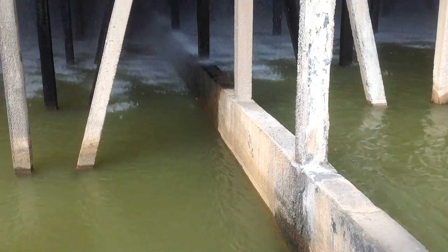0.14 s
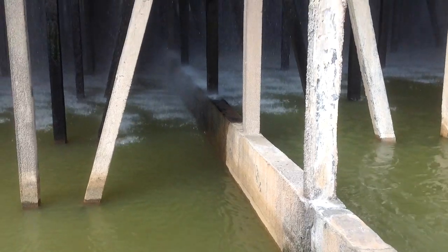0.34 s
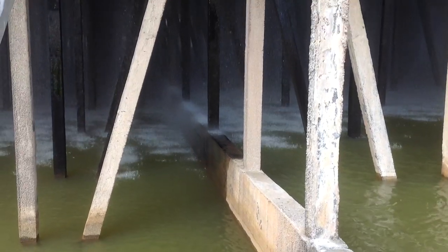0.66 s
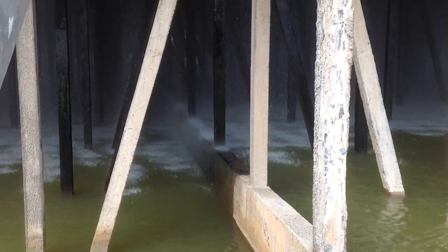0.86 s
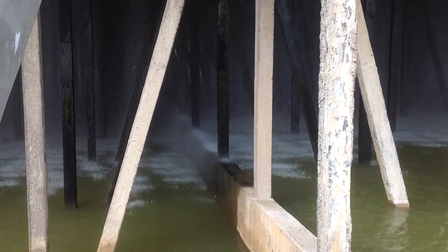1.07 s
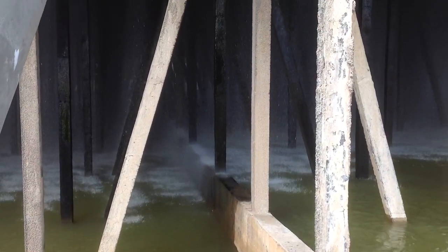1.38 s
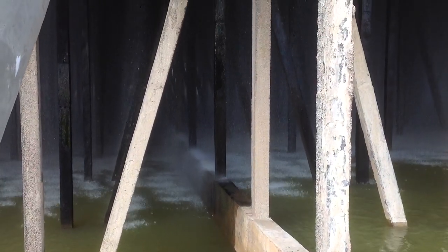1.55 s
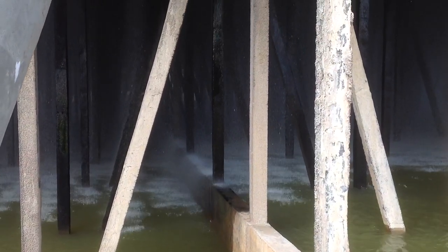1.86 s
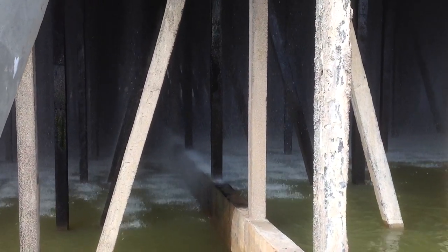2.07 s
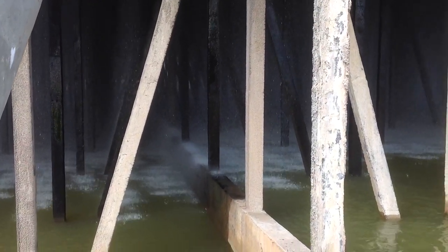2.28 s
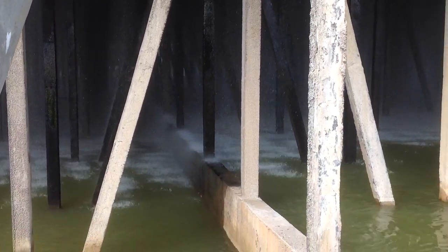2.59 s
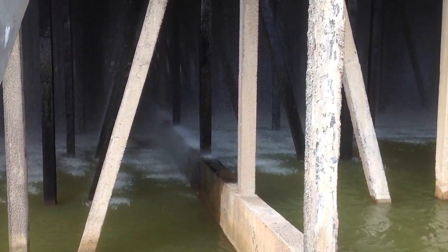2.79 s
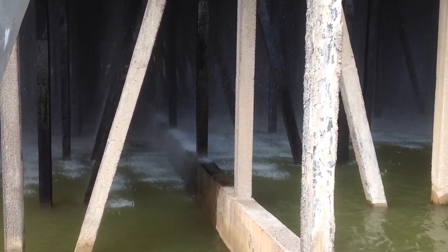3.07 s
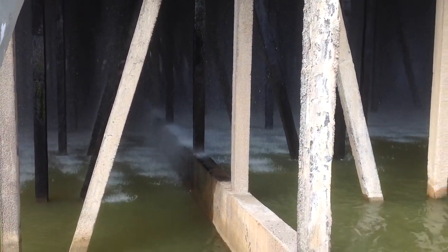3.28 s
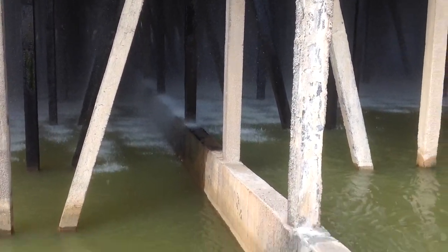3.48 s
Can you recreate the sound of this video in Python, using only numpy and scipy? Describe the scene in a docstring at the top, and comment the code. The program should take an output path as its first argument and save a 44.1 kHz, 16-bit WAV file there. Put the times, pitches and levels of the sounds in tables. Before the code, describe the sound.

After a blink of silence, a loud continuous downpour starts abruptly: bright hiss, fine drop ticks and a dark hollow roar inside a cooling tower, with wind rumble and two quick thumps on the mono microphone.

```python
"""After a moment of silence, a deep roar under a dense hiss: water rains down inside a big cooling
tower and lands in its basin, heard from the open side. Roar and hiss are shaped, drifting noise;
drops are random impulses and bubbles are short decaying tones. The draught rumbles and buffets
a single microphone as low noise, and twice thumps it with a sharp pressure swing."""
import sys
import numpy as np
from scipy import signal
from scipy.fft import rfft, irfft
from scipy.io import wavfile
from scipy.ndimage import uniform_filter1d

SR = 44100
rng = np.random.default_rng(int(sys.argv[2]) if len(sys.argv) > 2 else 0)


def inscribe(sig):
    """Save sig as 16-bit PCM at rate SR to the path in sys.argv[1].

    A 1-D sig is mono; a 2-D sig holds one channel per row.
    Samples are clipped to [-1, 1] before scaling.
    """
    pcm = np.round(np.clip(np.atleast_2d(sig).T, -1, 1) * 32767)
    wavfile.write(sys.argv[1], SR, pcm.astype(np.int16))


N = 160524
TIME_S = np.arange(N) / SR
FREQ_HZ = np.fft.rfftfreq(N, 1 / SR)


def amp(db):
    """Decibels to gain."""
    return 10 ** (np.asarray(db) / 20)


def unit(x):
    """Scales to an rms of one."""
    return x / np.sqrt(np.mean(x ** 2) + 1e-20)


def curve(points):
    """Joins (time [s], value) points by straight lines."""
    return np.interp(TIME_S, *np.transpose(points))


def colour(x, points):
    """Filters by a spectrum table, read on a log-frequency axis."""
    table_hz, table_db = np.transpose(points)
    gain_db = np.interp(np.log(FREQ_HZ + 1), np.log(table_hz + 1), table_db)
    return irfft(rfft(x) * amp(gain_db), N)


def smooth(x, size, axis=0):
    """Slow random drift: two moving averages, scaled to an rms of one."""
    once = uniform_filter1d(x, size, axis)
    return unit(uniform_filter1d(once, size, axis))


def wash(points, patch_db, swell_db):
    """Countless impacts merged into noise that swells as a whole and in drifting patches."""
    size, hop = 512, 128  # samples
    frames, bins = N // hop + 5, size // 2 + 1
    real, imag, patches = rng.standard_normal((3, frames, bins))
    patches = smooth(smooth(patches, size=14), size=6, axis=1)  # over time, then frequency
    swell = smooth(rng.standard_normal(frames), size=14)[:, None]
    gain = amp(patch_db * patches + swell_db * swell)
    frames_spectrum = (real + 1j * imag) * gain
    noise = signal.istft(frames_spectrum.T, nperseg=size, noverlap=size - hop)[1][:N]
    return unit(colour(noise, points))


def impacts(per_s, spread_db):
    """Randomly timed impulses of either sign, a few much larger than the rest."""
    size = amp(spread_db * np.minimum(rng.exponential(1, N), 4))
    sign = rng.choice([-1, 1], N)
    struck = rng.random(N) < per_s / SR
    return size * sign * struck


# draught strength at the microphone: (time [s], level [dB])
DRAUGHT_LEVEL = [(.09, -32), (.7, -33), (1.12, -28.5), (1.36, -32), (1.46, -23.5), (1.6, -22), (1.7, -29),
                 (1.8, -36), (2.8, -33.5), (3.62, -39)]
# draught colour: (frequency [Hz], relative density [dB per Hz])
DRAUGHT_SPECTRUM = [(25, -40), (55, -43), (100, -11.5), (160, 5), (230, 2), (320, -2.5), (500, -10.5),
                    (1000, -28), (3000, -62)]


def wind():
    """The draught rumbles at the microphone: low noise of varying strength."""
    rumble = unit(colour(rng.standard_normal(N), DRAUGHT_SPECTRUM))
    return amp(curve(DRAUGHT_LEVEL)) * rumble


# eddies: (time [s], level [dB], length [s], centre [Hz])
EDDIES = [(0.107, -10.5, 0.0084, 185), (0.121, -16.5, 0.012, 215), (0.225, -22, .022, 217),
          (0.399, -20, .015, 201), (0.501, -15, 0.011, 215), (0.861, -19.5, .016, 190),
          (0.987, -16, 0.018, 262), (1.041, -25, .012, 280), (1.11, -24, 0.031, 170),
          (1.445, -20, 0.014, 185), (1.489, -17, 0.01, 280), (1.514, -16, .009, 240),
          (1.594, -16, .012, 198), (1.692, -20, 0.018, 188), (2.143, -20.5, .014, 205),
          (2.199, -25, 0.018, 160), (2.946, -24, 0.034, 177), (3.459, -21.5, .028, 187)]
EDDY_WIDTH_OCT = 0.35


def buffets():
    """Each passing eddy is a short burst of turbulence about its own low pitch."""
    out = np.zeros(N)
    turbulence = rfft(rng.standard_normal(N))
    for time_s, level_db, length_s, centre_hz in EDDIES:
        shape = np.exp(-2 * np.minimum(abs(TIME_S - time_s) / length_s, 10) ** 2)
        octaves = np.log2((FREQ_HZ + 1) / centre_hz)
        band = np.exp(-0.5 * np.minimum(abs(octaves) / EDDY_WIDTH_OCT, 10) ** 2)
        burst = unit(shape * irfft(turbulence * band, N))
        out += amp(level_db) * np.sqrt(np.mean(shape ** 2)) * burst  # level holds at any length
    return out


# pressure swings: (time [s], peak before the low cut [dB], width [s])
PRESSURE_SWINGS = [(1.546, -4, 0.00085), (1.609, -1, 0.00051)]
LOW_CUT_HZ = 200


def thumps():
    """Single swings of air pressure, thinned by the microphone's low cut."""
    pressure = np.zeros(N)
    for time_s, peak_db, width_s in PRESSURE_SWINGS:
        u = (TIME_S - time_s) / width_s
        pressure += amp(peak_db) * u * np.exp((1 - u ** 2) / 2)
    low_cut = signal.butter(2, LOW_CUT_HZ, "high", fs=SR, output="sos")
    return signal.sosfilt(low_cut, pressure)


# roar of the interior: (frequency [Hz], relative density [dB per Hz])
ROAR_SPECTRUM = [(25, -41), (50, -39), (70, -22), (100, -24.5), (160, -10), (260, -4), (490, -3.5),
                 (570, 0.5), (680, -0.5), (900, -1.5), (1400, -8.5), (3000, -10.5), (8000, -15),
                 (15500, -30)]
ROAR_DB, ROAR_PATCH_DB, ROAR_SWELL_DB = -18.5, 0.76, 0.15


def roar():
    """The far downpour, darkened by the inside of the tower."""
    return amp(ROAR_DB) * wash(ROAR_SPECTRUM, ROAR_PATCH_DB, ROAR_SWELL_DB)


BUBBLES_DB, BUBBLES_PER_S, BUBBLE_SPREAD_DB = -27.5, 600, 1.5
BUBBLE_LOW_HZ, BUBBLE_HIGH_HZ = 898, 6010
BUBBLE_CYCLES, BUBBLE_RISE = 24, 0.015  # cycles to decay to e^-2; phase advance per that span


def bubbles(count=36):
    """Drops trap bubbles of many sizes; each rings briefly and rises in pitch."""
    t = np.arange(SR // 10) / SR
    out = np.zeros(N)
    births = impacts(BUBBLES_PER_S, BUBBLE_SPREAD_DB)
    kind = rng.integers(0, count, N)
    for k, hz in enumerate(np.geomspace(BUBBLE_LOW_HZ, BUBBLE_HIGH_HZ, count)):
        age = hz * t / BUBBLE_CYCLES
        ring = np.exp(-2 * age) * np.cos(2 * np.pi * hz * t * (1 + BUBBLE_RISE * age))
        out += signal.oaconvolve(births * (kind == k), ring)[:N]
    return amp(BUBBLES_DB) * unit(out)


# hiss of drops landing on the basin: (frequency [Hz], relative density [dB per Hz])
SPLASH_SPECTRUM = [(50, -48), (150, -28), (600, -15.5), (1400, -6), (2300, -3), (2850, -3), (3100, -1.7),
                   (3700, -2.5), (4300, -2.5), (4950, -1), (6600, 0), (8500, -.5), (10500, -2),
                   (12700, -5.5), (15500, -6)]
SPLASH_DB, SPLASH_PATCH_DB, SPLASH_SWELL_DB = -13.5, 1.27, 0.72
DROPS_DB, DROPS_PER_S, DROP_SPREAD_DB = -20.5, 3500, 2.5


def splash():
    """The hiss of the nearer water, with the ticks of the closest drops."""
    hiss = wash(SPLASH_SPECTRUM, SPLASH_PATCH_DB, SPLASH_SWELL_DB)
    drops = unit(colour(impacts(DROPS_PER_S, DROP_SPREAD_DB), SPLASH_SPECTRUM))
    return amp(SPLASH_DB) * hiss + amp(DROPS_DB) * drops


# gain of the water's treble: (time [s], level [dB])
TREBLE_LEVEL = [(.09, 0), (.15, -5), (.25, -1.5), (.32, 1), (.42, 1.6), (.51, 2.5), (.64, 1), (.8, -0.3),
                (.96, 1), (1.0, -0.8), (1.21, 1.5), (1.32, -0.2), (2.2, -0.74), (2.95, 0), (3.08, -0.7),
                (3.2, -0.5), (3.62, -0.1)]
TREBLE_HZ = 3970


def scene():
    """Water and wind in mono; the water's treble dips and swells early on, then settles."""
    water = roar() + bubbles() + splash()
    high_pass = 1 - 1 / (1 + (FREQ_HZ / TREBLE_HZ) ** 12)
    treble = irfft(rfft(water) * high_pass, N)
    water = water + (amp(curve(TREBLE_LEVEL)) - 1) * treble
    mono = wind() + buffets() + thumps() + water
    return np.array([mono, mono])


START_S, OPEN_S = 0.082, 0.0033
EDGE_HZ = 15450


def record(dry):
    """The microphone opens after a moment of silence; clips at full scale, then band-limits."""
    opened = np.clip((TIME_S - START_S) / OPEN_S, 0, 1)
    clipped = np.clip(dry * opened, -1, 1)
    low_pass = signal.firwin(1023, EDGE_HZ, window=("kaiser", 9), fs=SR)
    return signal.oaconvolve(clipped, low_pass[None], "same", axes=1)


dry = scene()
out = record(dry)
inscribe(out)
```